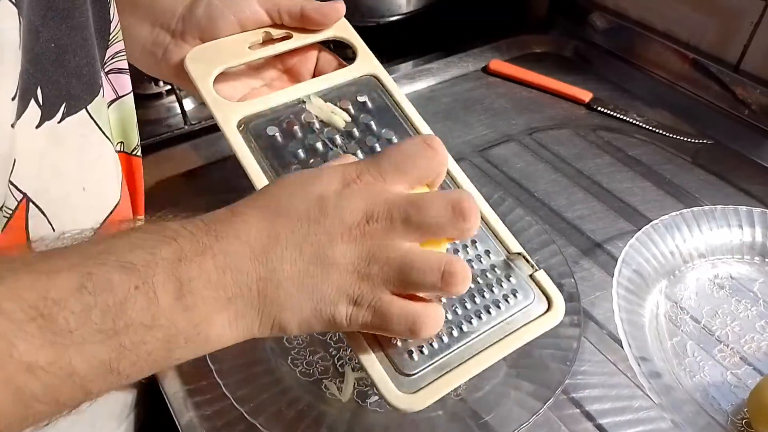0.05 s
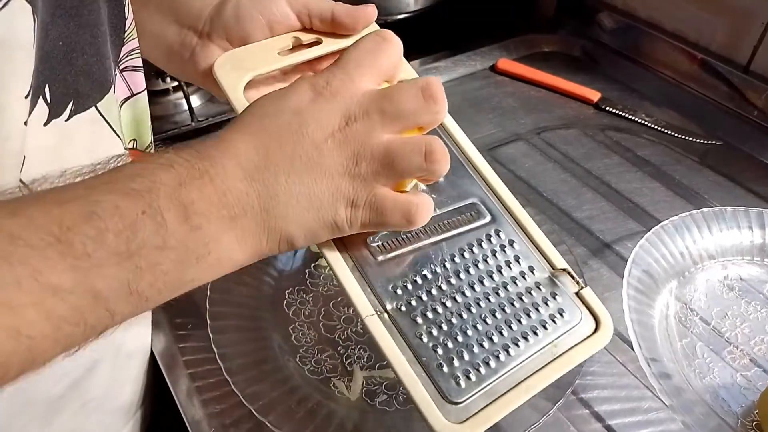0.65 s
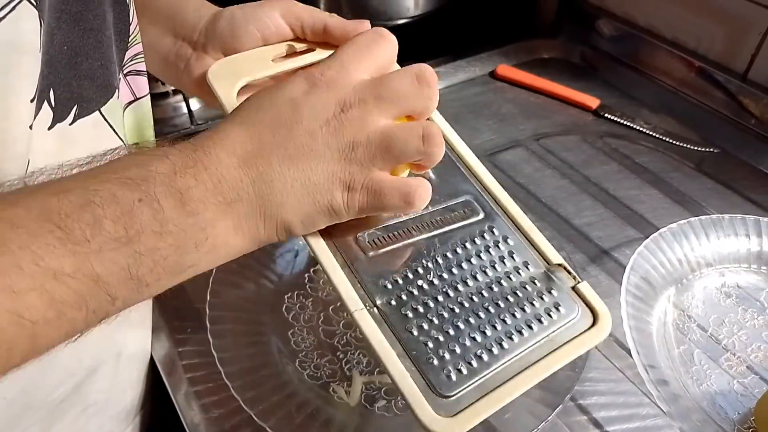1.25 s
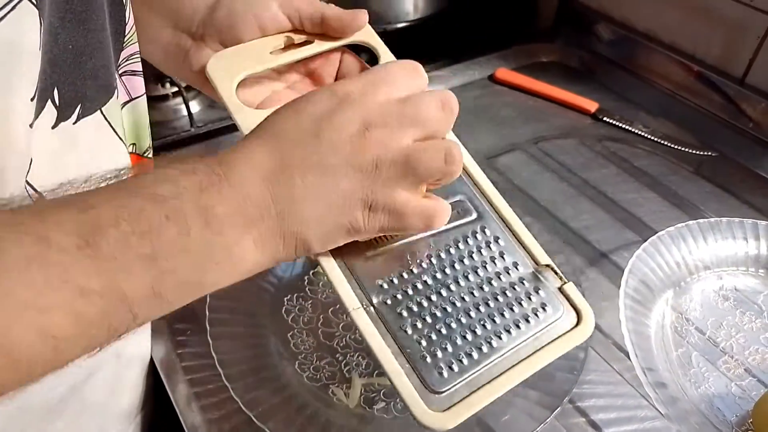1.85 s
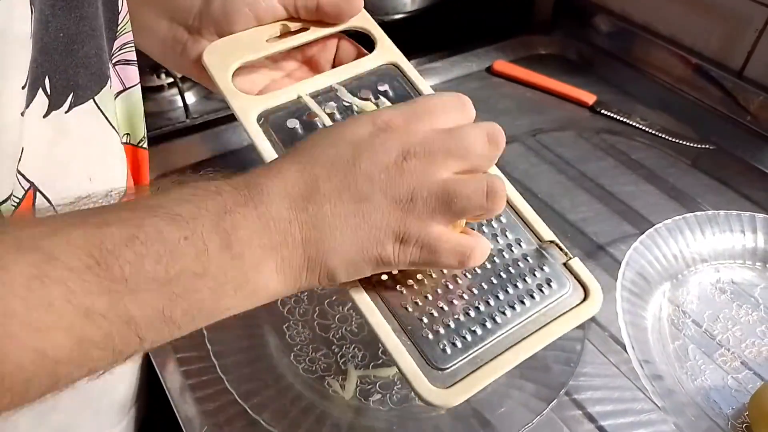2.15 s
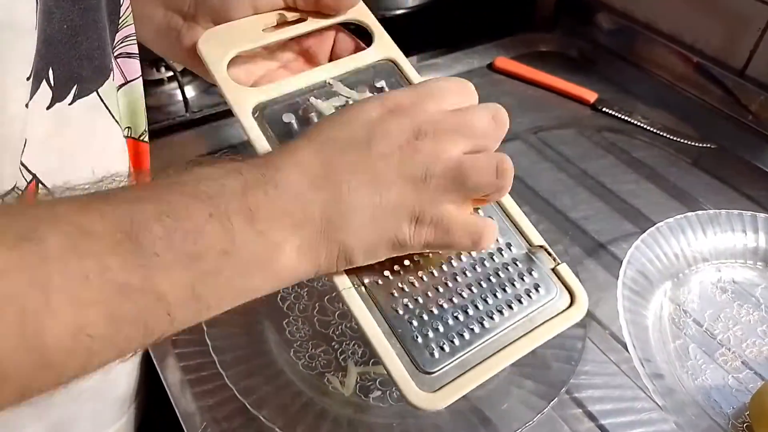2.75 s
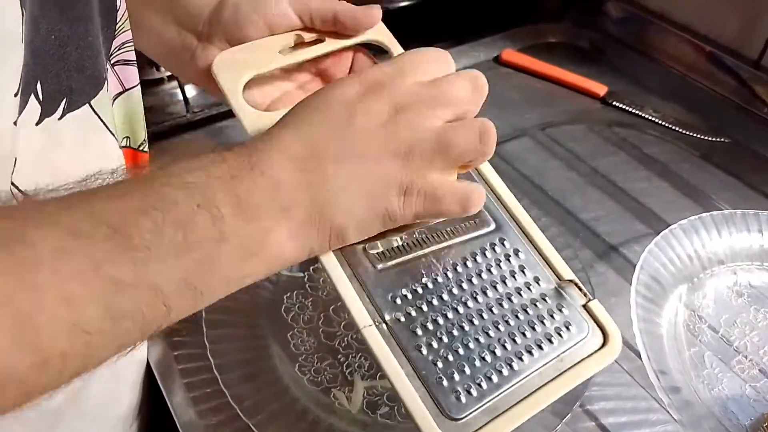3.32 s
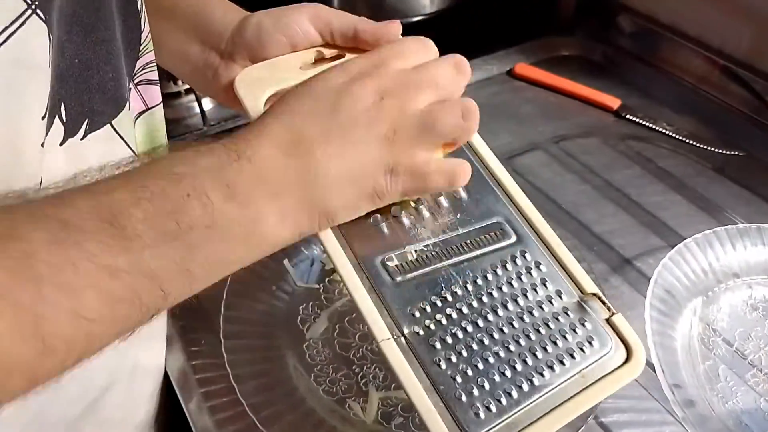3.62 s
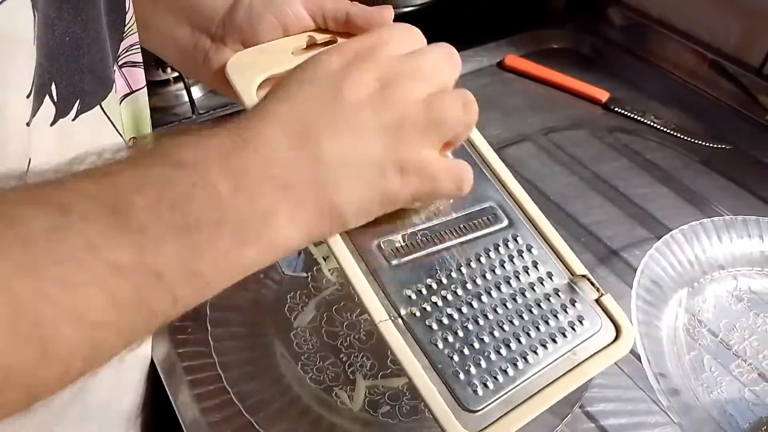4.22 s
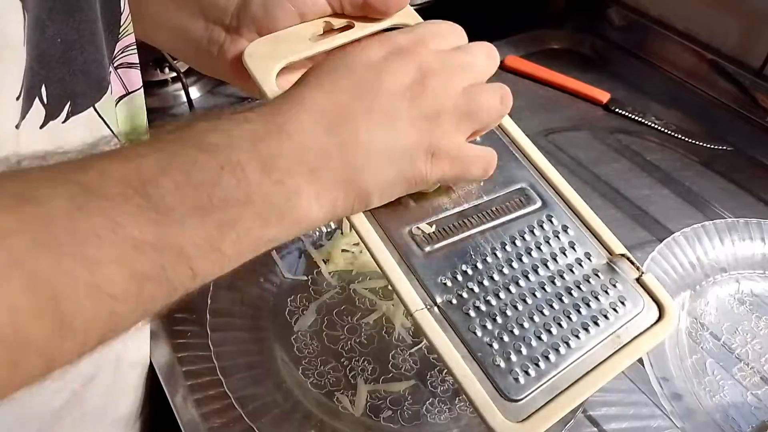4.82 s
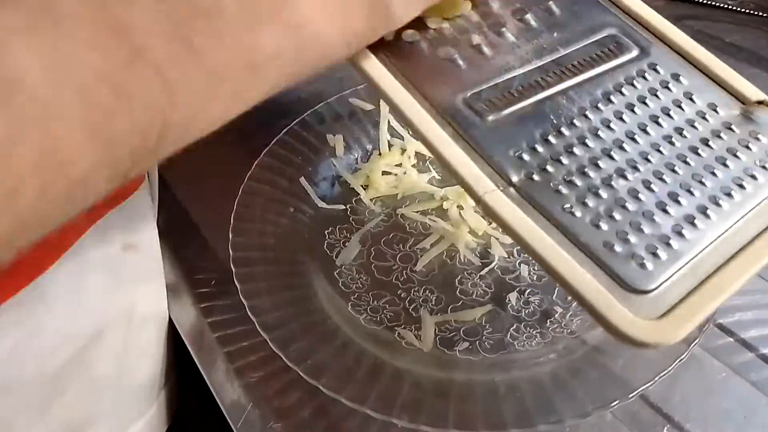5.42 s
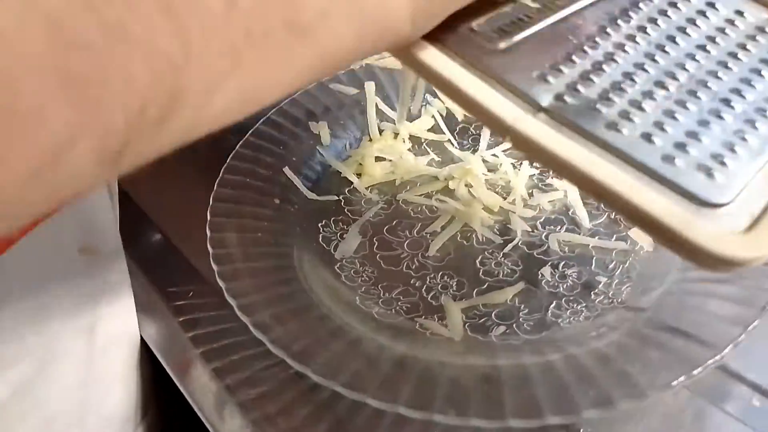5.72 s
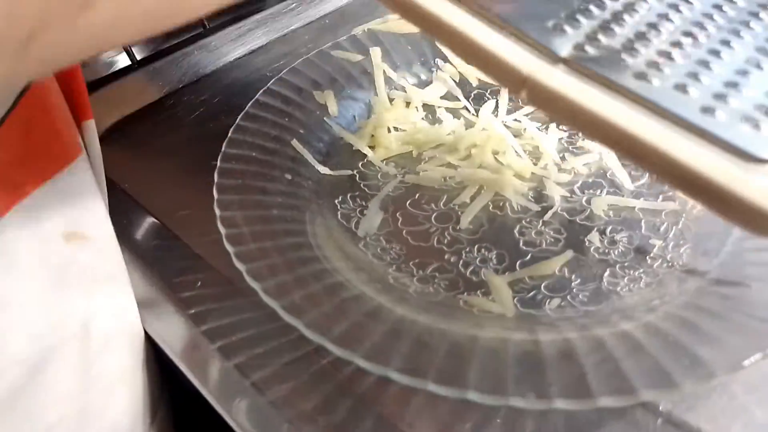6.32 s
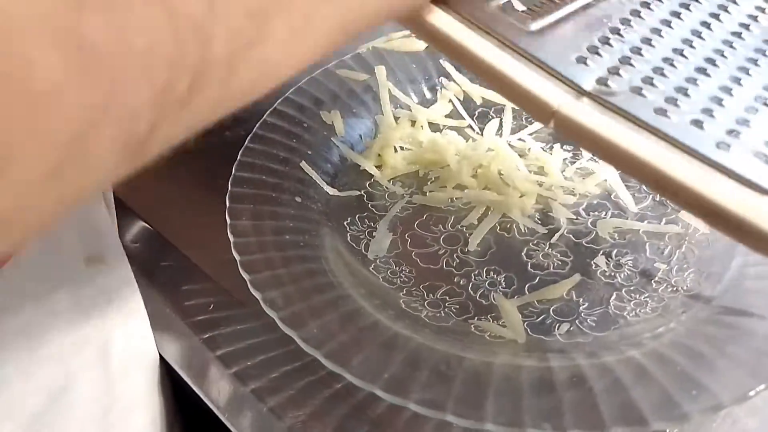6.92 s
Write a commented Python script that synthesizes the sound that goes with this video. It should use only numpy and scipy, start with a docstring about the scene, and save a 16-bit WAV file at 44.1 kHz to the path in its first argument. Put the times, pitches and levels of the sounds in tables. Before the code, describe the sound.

A raw potato brushes lightly over a flat steel grater in the first half second, close to the microphone. At about 0.7 seconds the grater knocks against a glass dish with a light, briefly ringing clink. Grating starts around 1.3 seconds and continues to the end, near seven seconds, settling at about four strokes a second. Each push is a short, bright, crackling rasp of crisp flesh tearing, with a slight metallic ring. The slides back are barely audible at first, then clearer from about 2.5 seconds, making a back-and-forth rhythm. Small snags add sharp spurts, mostly between 1.3 and 3 seconds, and the sheet ticks in its plastic frame near 1.4, 2 and 5.3 seconds. The microphone moves closer, so the strokes are somewhat louder and change in ring from about five seconds. Behind are short kitchen reflections, soft room noise and a faint appliance hum.

```python
"""A raw potato is grated on a flat steel grater in a plastic frame, close by in a small kitchen.
Each push tears the crisp flesh in a dense crackle; then the potato slides lightly back over the teeth.
The steel sheet rings under both. Before the work gets going, the grater knocks against the glass dish.
One microphone moves in on the grater from about two seconds on; behind it all are short room
reflections, soft room noise and a faint appliance hum."""
import sys
import numpy as np
from scipy import signal
from scipy.fft import rfft, irfft
from scipy.io import wavfile

SR = 44100
rng = np.random.default_rng(int(sys.argv[2]) if len(sys.argv) > 2 else 0)


def materialize(psi):
    """Save the field psi as 16-bit PCM at rate SR to the path in sys.argv[1].

    A 1-D psi becomes a single channel; in a 2-D psi each row is a channel.
    """
    bounded = np.clip(np.atleast_2d(psi).T, -1, 1)
    quanta = np.round(bounded * 32767).astype(np.int16)
    wavfile.write(sys.argv[1], SR, quanta)


N = 307377
TIME = np.arange(N) / SR


# The arm's strokes, each a push and a slide back: start_s, push_length_s, push_db, pressure_db, slide_db
STROKES = [(1.261, 0.091, -24, -6.5, -47), (1.577, 0.097, -25.5, 1.5, -45),
           (1.864, 0.081, -22.5, -0.5, -56), (2.14, 0.095, -24.5, -0.5, -77),
           (2.477, 0.1, -21.5, -0.5, -31.5), (2.741, 0.11, -24, 1.5, -39), (3, 0.11, -22.5, 0, -35),
           (3.261, .1, -22.5, 3, -36.5), (3.522, 0.12, -23.5, 4, -25.5), (3.773, 0.11, -23.5, 2.5, -30),
           (4.014, 0.1, -23.5, -3.5, -29), (4.258, 0.1, -22.5, -3.5, -30), (4.492, 0.092, -23, -1.5, -34),
           (4.739, 0.094, -22, -3, -30.5), (4.98, 0.091, -20.5, 2.5, -29), (5.218, 0.089, -20, -2, -33),
           (5.47, 0.11, -18.5, -5.5, -30), (5.711, 0.098, -21, 1, -33.5), (5.963, 0.095, -21, 0, -28),
           (6.202, 0.1, -20.5, 1, -24.5), (6.441, 0.1, -21, 1.5, -30.5), (6.686, 0.094, -21.5, -1.5, -33),
           (6.93, 0.11, -20.5, -3.5, -28)]
# Tone colour of tearing flesh: frequency_hz, relative_db
TEARING_COLOUR = [(220, -42), (400, -35.5), (850, -24.5), (1400, -19), (2100, -19.5), (2800, -16.5),
                  (4000, -17), (6100, -12), (8000, -1.5), (9900, 1), (12500, -7), (15800, -13.5)]

def cutting():
    """The teeth tear strips off the potato on every push."""
    grains = crackle(bursts_per_s=3500, catch_db=0.97, catches_per_s=280, friction_db=-5)
    loudness, drive = stroke_motion([push(*stroke) for *stroke, _ in STROKES])
    return from_db(-0.4) * rasp(grains, loudness, drive, TEARING_COLOUR, flex_hz=3100)


def push(start, length, level_db, pressure_db, touch_s=0.013, bite_s=0.0019):
    """One pass: the potato touches, jerks on as the teeth bite, runs at full speed and stops."""
    run = start + length * np.array([0.37, 0.68, 1])
    times = [start - touch_s, start, start + bite_s, *run]
    speeds = [0, 0.42, 0.49, 1, 1, 0]
    return times, speeds, level_db, level_db + pressure_db


def stroke_motion(passes):
    """Each pass rubs louder with speed; returns the loudness and the drive on the sheet."""
    loudness, drive = np.zeros(N), np.zeros(N)
    for times, speeds, level_db, flex_db in passes:
        rub = np.interp(TIME, times, speeds) ** 1.5
        loudness += rub * from_db(level_db)
        drive += rub * from_db(flex_db)
    return loudness, drive


def crackle(bursts_per_s, catch_db, catches_per_s, friction_db):
    """Cells burst as clicks of uneven size over wet friction, in clumps as the teeth catch."""
    size_db = np.minimum(rng.exponential(1, N), 4)
    clicks = from_db(size_db) * rng.choice([-1, 1], N)
    bursts = unit_rms(clicks * (rng.random(N) < bursts_per_s / SR))
    friction = from_db(friction_db) * rng.standard_normal(N)
    clumps = from_db(catch_db * drift(catches_per_s))
    return unit_rms((bursts + friction) * clumps)


def rasp(grains, loudness, drive, colour, flex_hz):
    """The crackle follows the stroke; its low part, the flexing sheet, follows the uneven pressure."""
    pressure = drive * from_db(1.5 * drift(50))
    lowpass = signal.butter(1, flex_hz, fs=SR, output="sos")
    flex = signal.sosfilt(lowpass, grains * (pressure - loudness))
    return coloured(grains * loudness + flex, colour)


# The potato brushes the teeth as it is placed or shifted: start_s, length_s, level_db, pressure_db
BRUSHES = [(0.177, 0.1, -32, -11), (0.31, 0.1, -38, -25), (0.438, 0.14, -58, -12), (1.09, 0.066, -48.5, -8),
           (1.216, .07, -37, -20), (2.054, 0.05, -37, 2), (2.348, .068, -44.5, -13)]
# Tone colour of sliding flesh: frequency_hz, relative_db
SLIDING_COLOUR = [(300, -33.5), (850, -23), (1000, -18.5), (1400, -13), (2050, -14), (2800, -12.5),
                  (4000, -14.5), (6100, -8.5), (9800, 4), (12500, -6), (15800, -9.5)]

def sliding():
    """The wet cut face skips unevenly over the backs of the teeth."""
    grains = crackle(bursts_per_s=2000, catch_db=-0.1, catches_per_s=200, friction_db=2)
    skipping = from_db(1.8 * drift(70))
    brushes = [glide(start, length, level_db, level_db + pressure_db)
               for start, length, level_db, pressure_db in BRUSHES]
    loudness, drive = stroke_motion(brushes + slides_back())
    return from_db(-1.72) * rasp(grains * skipping, loudness, drive, SLIDING_COLOUR, flex_hz=3040)


def slides_back(pause_after_push_s=0.0068, pause_before_push_s=0.012):
    """Between one push and the next the hand draws the potato back up the grater."""
    starts, lengths, _, _, slide_db = np.transpose(STROKES)
    leaves = (starts + lengths + pause_after_push_s)[:-1]
    arrives = starts[1:] - pause_before_push_s
    # the hand's weight flexes the sheet even in a faint slide
    flex_db = -31 + 0.3 * (slide_db - np.median(slide_db))
    return [glide(*slide) for slide in zip(leaves, arrives - leaves, slide_db, flex_db)]


def glide(start, length, level_db, flex_db):
    """One pass without biting: the potato gathers speed, runs and stops."""
    times = start + length * np.array([0, 0.39, 0.72, 1])
    speeds = [0, 1, 1, 0]
    return times, speeds, level_db, flex_db


# The potato snags on a tooth and snaps free: start_s, level_db
SNAGS = [(.246, -35), (0.348, -29.5), (1.352, -25), (1.414, -30.5), (1.509, -29), (1.586, -29),
         (1.766, -29), (1.795, -28.5), (1.845, -31.5), (1.869, -30), (1.945, -24), (2.4755, -22),
         (2.955, -29), (3.527, -25), (5.4105, -22), (5.688, -35), (6.828, -30)]

def snagging():
    """A caught piece of flesh gives way in a short spurt of noise."""
    return from_db(-1) * coloured(noise_bursts(SNAGS, t60_s=0.055), TEARING_COLOUR)


# Resonances of the steel, from farther off and close up: pitch_hz, undamped_width_hz, far_db, near_db
SHEET_MODES = [(462, 5.5, -11, 3), (1100, 14.5, 9, -25), (1348, 12, 1.5, 5.5), (1840, 17, -40, 10.5),
               (2850, 74, 2.5, -18), (3110, 210, -21, 7.5), (3830, 360, -75, 6), (4836, 200, -7.5, -2),
               (5700, 200, -56, 0), (10450, 1070, -39, 0.5)]

def sheet_ringing(scrape, hand_damping_hz=22):
    """The scrape plus the sheet's resonances, which swell and fade as the potato crosses their nodes."""
    near = mic_closeness()
    ringing = np.zeros(N)
    for pitch_hz, width_hz, far_db, near_db in SHEET_MODES:
        heard_db = far_db + near * (near_db - far_db)
        contact_db = 2.5 * drift(14)
        ringing += resonance(scrape * from_db(heard_db + contact_db), pitch_hz, width_hz + hand_damping_hz)
    return from_db(-0.69) * (scrape + ringing)


# The microphone's approach to the grater: time_s, closeness (0 farthest, 1 nearest)
MIC_PATH = [(2.1, 0), (4.0, 0.13), (5.0, 0.35), (5.6, 0.82), (6.9, 1)]

def mic_closeness():
    """How near the microphone is to the grater at each moment."""
    return np.interp(TIME, *np.transpose(MIC_PATH))


def teeth_ringing(scrape, count=48):
    """Many small modes of teeth and sheet ring briefly, each when the potato touches the right spot."""
    ringing = np.zeros(N)
    for pitch_hz in np.geomspace(2500, 12000, count) * rng.uniform(0.98, 1.02, count):
        touch = np.clip(drift(22), -0.7, 1.5)
        ringing += resonance(scrape * touch, pitch_hz, width_hz=70)
    return from_db(-2) * ringing


# The grater meets the glass dish and bounces twice: start_s, level_db
KNOCKS = [(0.6700, -47.5), (0.6749, -41), (0.687, -68)]
# Modes that ring after the knock: pitch_hz, relative_db, t60_s
KNOCK_MODES = [(626, -12, .3), (1125, -7, .3), (1665, -1, .33), (3075, 2, .22), (3125, 4, .26),
               (3210, 3, .22), (4285, 0, .38), (4908, 0, .21), (5268, 0, .22), (5411, 0, .19),
               (5508, 2, .22), (6163, -4, .28), (6695, 3, .22), (7450, -7, .26), (8027, 0, .21),
               (8344, 0, .24), (9437, -1, .25), (10990, -7, .2)]
# Broad tone colour of a knock: frequency_hz, relative_db
KNOCK_COLOUR = [(250, -47), (600, -12.5), (1650, -3.5), (2500, -7), (3150, -5), (3700, -10), (5400, -3.5),
                (9500, -3.5), (14500, -40)]

def dish_knock():
    """The first contact with the dish sets the modes ringing; every contact adds a brief crack."""
    first_s, first_db = KNOCKS[0]
    age = np.maximum(TIME - first_s, 0)
    ringing = np.zeros(N)
    for k, (pitch_hz, relative_db, t60_s) in enumerate(KNOCK_MODES):
        decay = from_db(first_db + relative_db - 60 * age / t60_s)
        ringing += (-1) ** k * decay * np.sin(2 * np.pi * pitch_hz * age)
    crack = coloured(noise_bursts(KNOCKS, t60_s=0.061), KNOCK_COLOUR)
    return from_db(1.5) * ringing + from_db(11.5) * crack


# Dry ticks of the sheet in its frame: start_s, level_db
FRAME_TICKS = [(1.441, -37), (2.017, -29), (5.345, -29)]

def frame_ticking():
    """The sheet shifts in its plastic frame with a short, pitched tap."""
    contact = noise_bursts(FRAME_TICKS, t60_s=0.02)
    tap = resonance(contact, pitch_hz=3300, width_hz=300)
    crack = from_db(-24) * coloured(contact, KNOCK_COLOUR)
    return from_db(9) * (tap + crack)


def kitchen_reflections(sound, paths=5):
    """The moving arm keeps changing the paths that the reflections take to the microphone."""
    shares = np.array([drift(6) for _ in range(paths)])
    shares /= np.sqrt(np.sum(shares ** 2, axis=0))
    return sum(signal.oaconvolve(sound * share, room_response())[:N] for share in shares)


# Reverberation of the small kitchen: frequency_hz, t60_s
KITCHEN_DECAY = [(1500, 0.63), (5000, 0.25), (10000, 0.26), (15000, 0.24)]

def room_response(first_echo_s=0.0011, build_s=0.0045, bands=8):
    """Dense reflections build up after a short gap and die sooner in the treble."""
    age = TIME[:SR // 2]
    edges_hz = np.geomspace(100, 18000, bands + 1)
    tail = np.zeros(len(age))
    for low, high in zip(edges_hz, edges_hz[1:]):
        bandpass = signal.butter(2, [low, high], "band", fs=SR, output="sos")
        t60_s = at_hz(KITCHEN_DECAY, np.sqrt(low * high))
        tail += signal.sosfilt(bandpass, rng.standard_normal(len(age))) * from_db(-60 * age / t60_s)
    tail *= np.clip((age - first_echo_s) / build_s, 0, 1)
    return tail / np.sqrt(np.sum(tail ** 2))


# Tone colour of the quiet kitchen: frequency_hz, relative_db
AIR_COLOUR = [(25, -15.5), (110, -23), (190, -18), (300, -12), (450, -6), (560, -13), (2070, -14.5),
              (5700, -32.5), (10000, -19), (15000, -46)]
# Faint appliance hum in the background: pitch_hz, level_db
APPLIANCE_HUM = [(121, -91), (155, -99), (302, -74.5)]

def room_tone():
    """Soft room noise with a wavering hum; a low rumble swells as the microphone nears the counter."""
    air = from_db(-64.5) * coloured(rng.standard_normal(N), AIR_COLOUR)
    hum = sum(from_db(level_db) * wavering_tone(pitch_hz, width_hz=8.1)
              for pitch_hz, level_db in APPLIANCE_HUM)
    rumble = from_db(-80) * mic_closeness() ** 3 * wavering_tone(pitch_hz=68, width_hz=7.8)
    return air + hum + rumble


def wavering_tone(pitch_hz, width_hz):
    """A narrow band of noise at unit power."""
    return unit_rms(resonance(rng.standard_normal(N), pitch_hz, width_hz))


def noise_bursts(events, t60_s):
    """Noise that jumps up at each event and dies away."""
    hits = np.zeros(N)
    for start_s, level_db in events:
        hits[round(start_s * SR)] = from_db(level_db)
    decay_per_sample = from_db(-60 / (t60_s * SR))
    envelope = signal.lfilter([1], [1, -decay_per_sample], hits + 1e-18)
    return rng.standard_normal(N) * envelope


def drift(turns_per_s):
    """Smooth random wander at unit power."""
    turns = rng.standard_normal(N // 20)
    return unit_rms(np.interp(TIME * turns_per_s, np.arange(len(turns)), turns))


def resonance(x, pitch_hz, width_hz):
    """Two-pole resonance with gain 1 at its peak."""
    radius = np.exp(-np.pi * width_hz / SR)
    feedforward = np.array([1, 0, -1]) * (1 - radius ** 2) / 2
    feedback = [1, -2 * radius * np.cos(2 * np.pi * pitch_hz / SR), radius ** 2]
    return signal.lfilter(feedforward, feedback, x + 1e-18)


def coloured(x, colour, size=4096):
    """Minimum-phase filter that keeps the power of a white input."""
    gain = unit_rms(from_db(at_hz(colour, np.fft.rfftfreq(size, 1 / SR))))
    cepstrum = irfft(np.log(gain))
    cepstrum[1:size // 2] *= 2  # folding onto positive time makes the filter causal
    cepstrum[size // 2 + 1:] = 0
    impulse_response = irfft(np.exp(rfft(cepstrum)))
    return signal.oaconvolve(x, impulse_response)[:N]


def at_hz(table, hz):
    """Read a table on a log-frequency axis."""
    freqs, values = np.transpose(table)
    return np.interp(np.log(np.maximum(hz, 1)), np.log(freqs), values)


def from_db(db):
    """Decibels to gain."""
    return 10 ** (np.asarray(db) / 20)


def unit_rms(x):
    """Scale to unit power."""
    return x / np.sqrt(np.mean(x ** 2) + 1e-20)


def scene():
    """Grater and dish at one close microphone; the dish radiates more into the kitchen."""
    scrape = cutting() + sliding() + snagging()
    grater = sheet_ringing(scrape) + teeth_ringing(scrape) + frame_ticking()
    dish = dish_knock()
    reflections = kitchen_reflections(from_db(-9.5) * grater + from_db(-4) * dish)
    return (grater + dish + reflections + room_tone())[None]


def record(dry, cutoff_hz=15800):
    """The highest treble is cut off steeply."""
    lowpass = signal.ellip(12, 0.1, 80, cutoff_hz, fs=SR, output="sos")
    return signal.sosfilt(lowpass, dry)


dry = scene()
out = record(dry)
materialize(out)
```